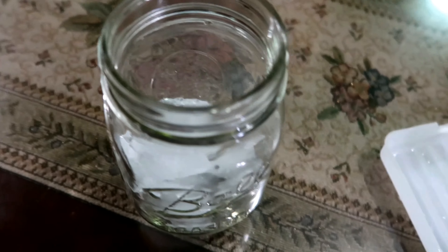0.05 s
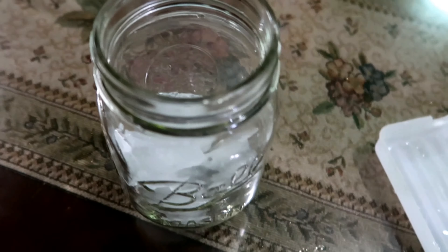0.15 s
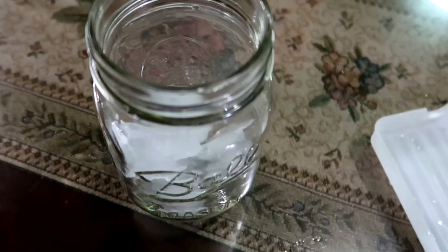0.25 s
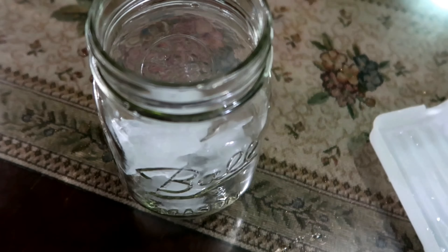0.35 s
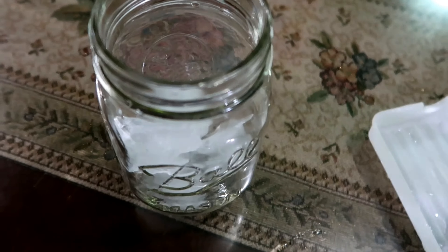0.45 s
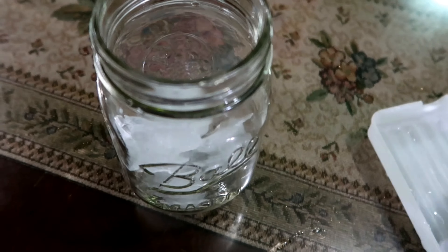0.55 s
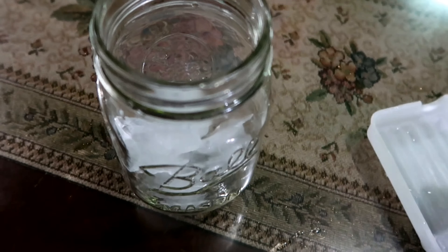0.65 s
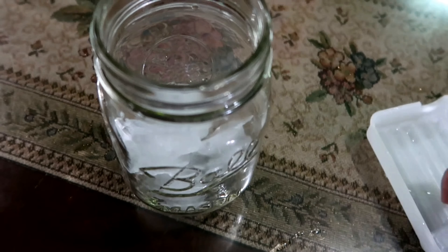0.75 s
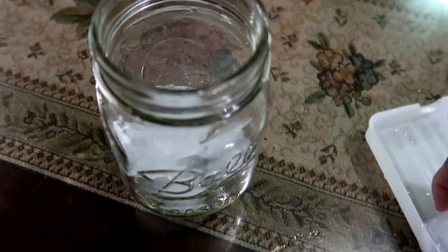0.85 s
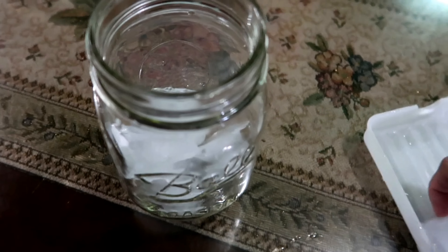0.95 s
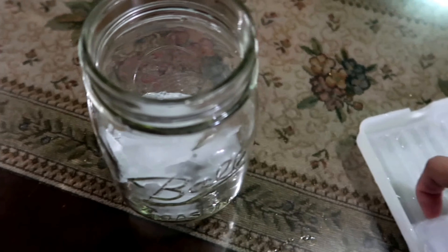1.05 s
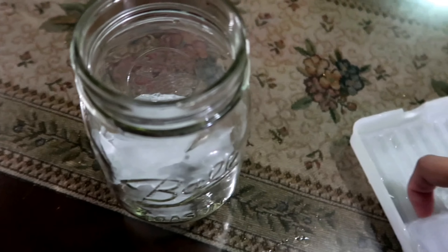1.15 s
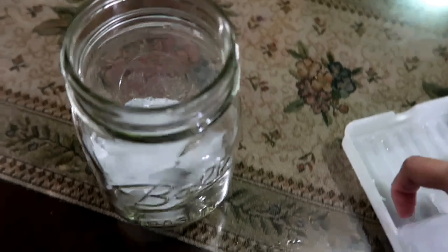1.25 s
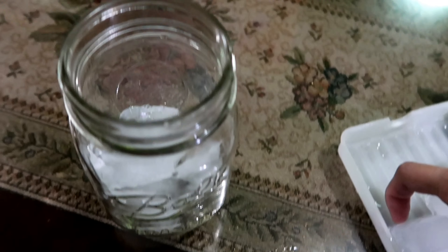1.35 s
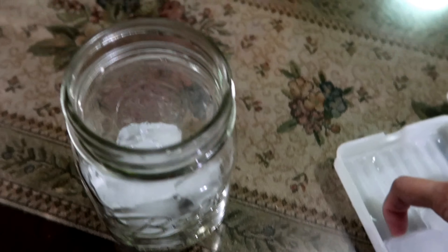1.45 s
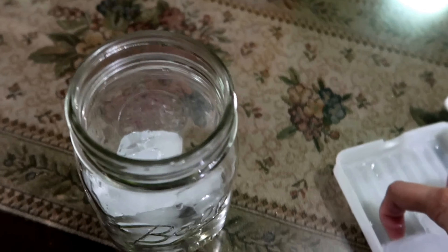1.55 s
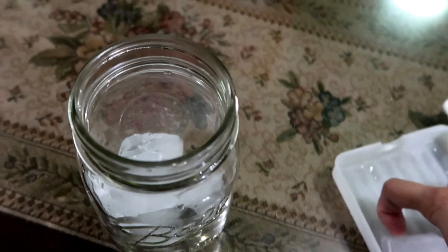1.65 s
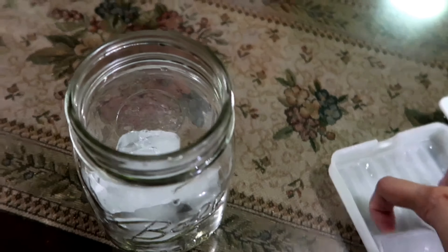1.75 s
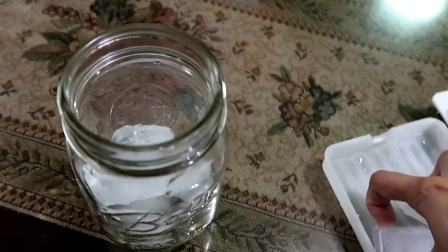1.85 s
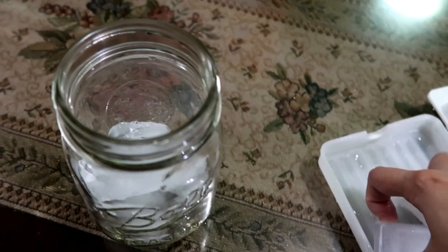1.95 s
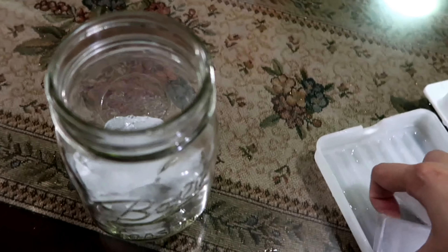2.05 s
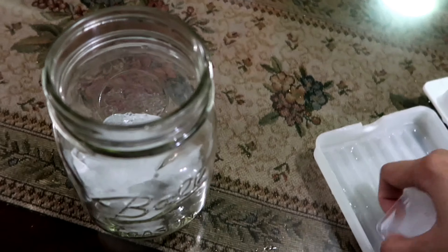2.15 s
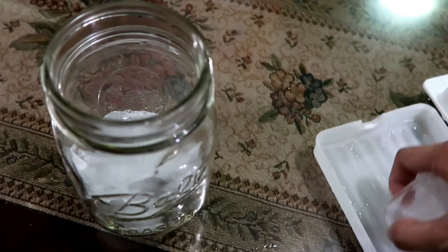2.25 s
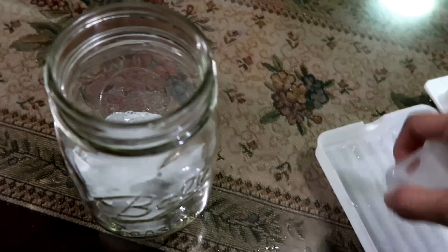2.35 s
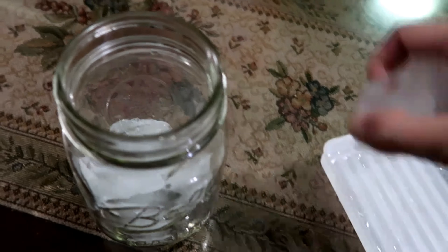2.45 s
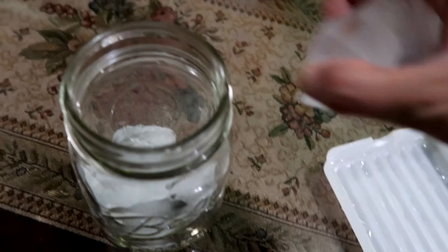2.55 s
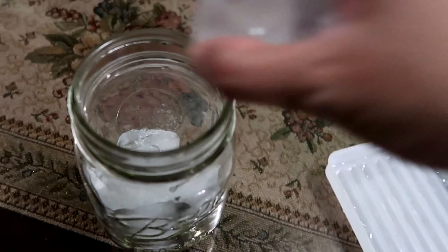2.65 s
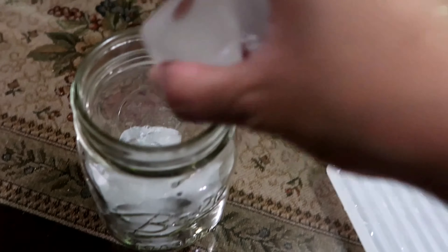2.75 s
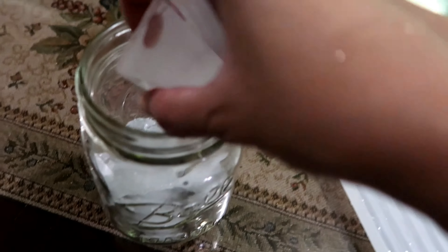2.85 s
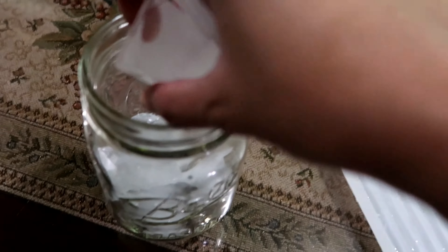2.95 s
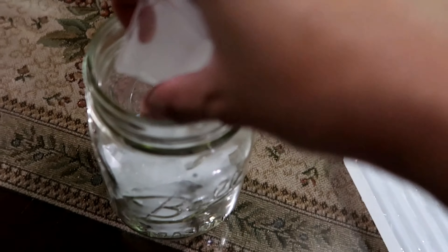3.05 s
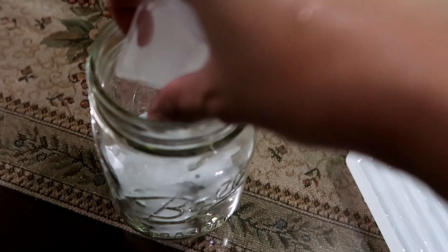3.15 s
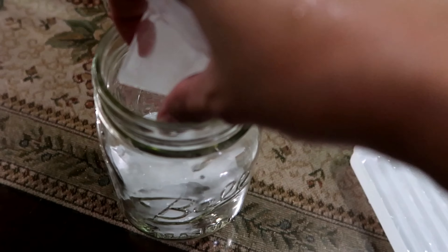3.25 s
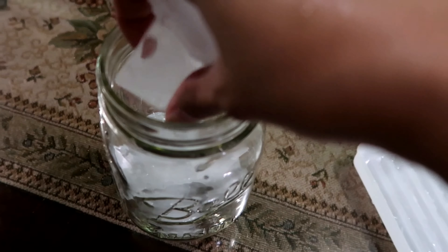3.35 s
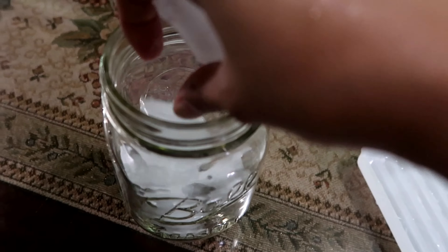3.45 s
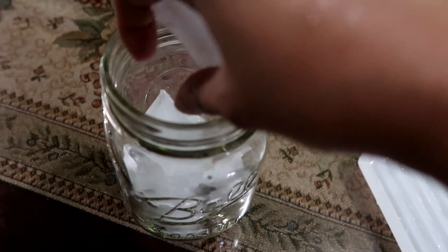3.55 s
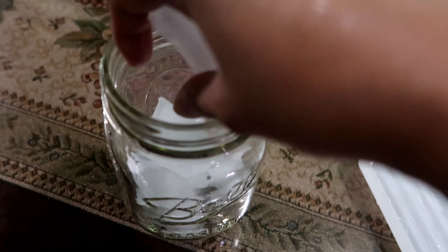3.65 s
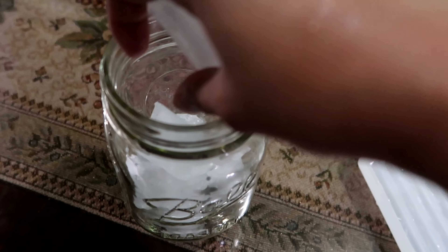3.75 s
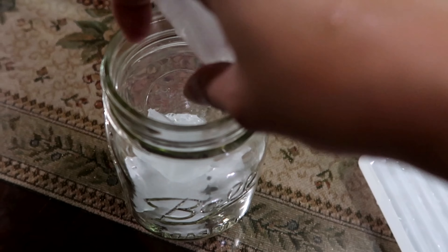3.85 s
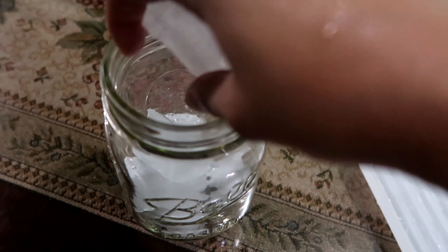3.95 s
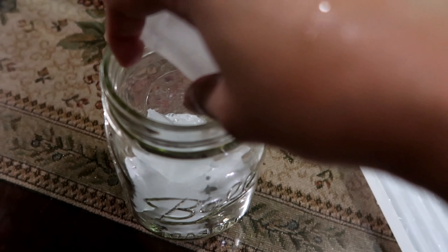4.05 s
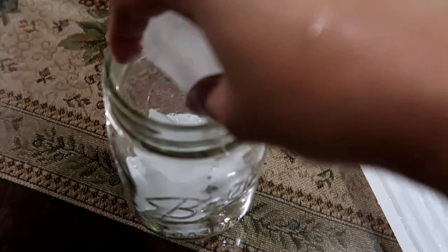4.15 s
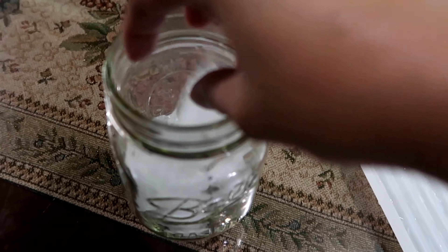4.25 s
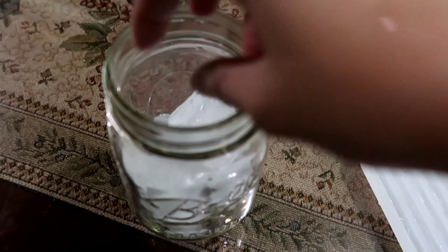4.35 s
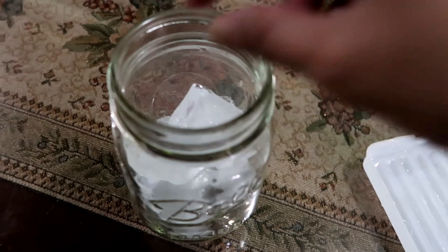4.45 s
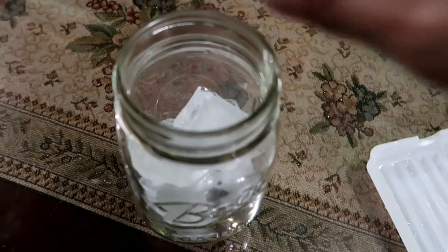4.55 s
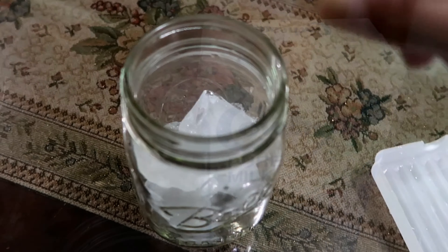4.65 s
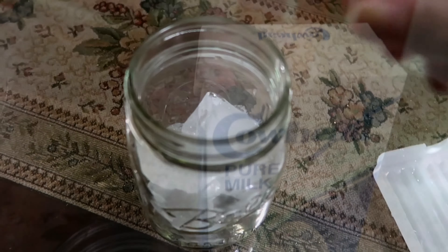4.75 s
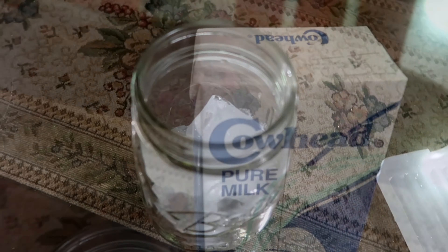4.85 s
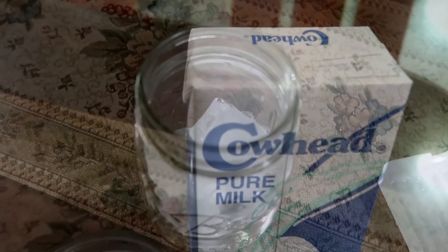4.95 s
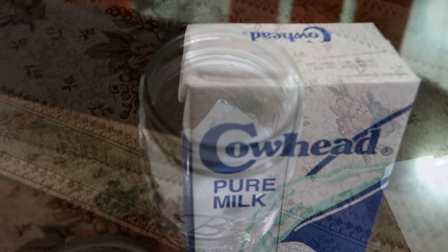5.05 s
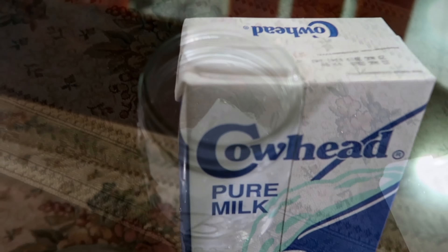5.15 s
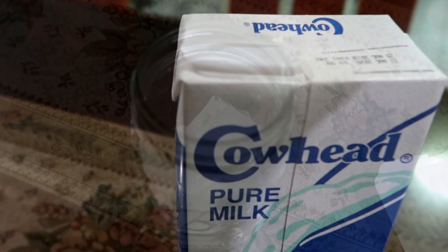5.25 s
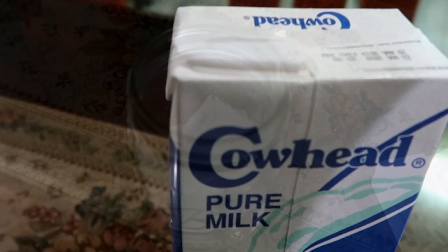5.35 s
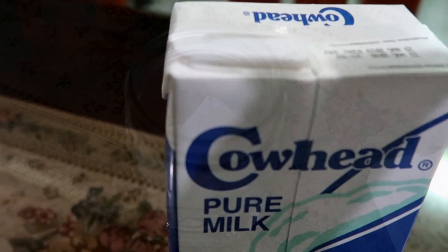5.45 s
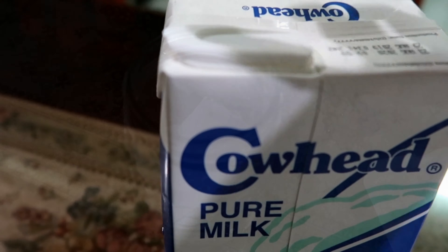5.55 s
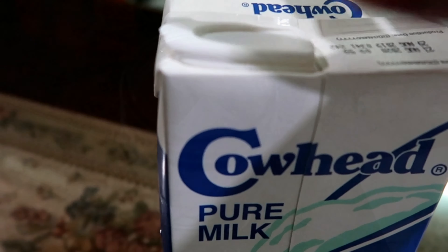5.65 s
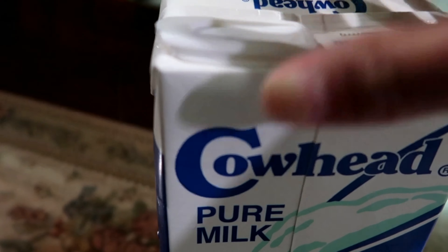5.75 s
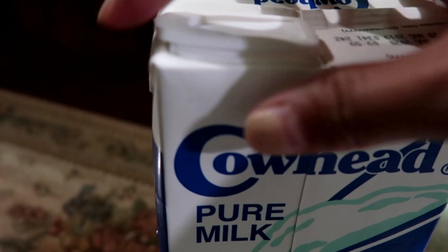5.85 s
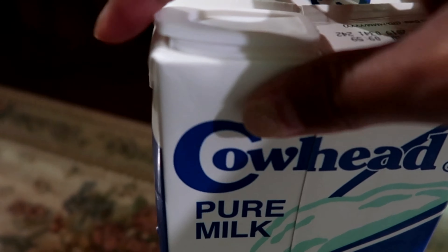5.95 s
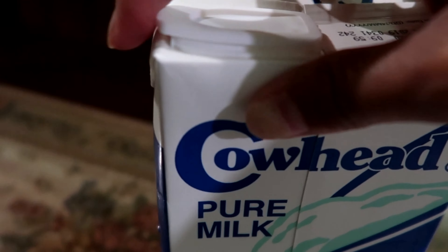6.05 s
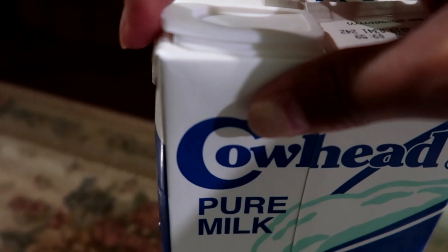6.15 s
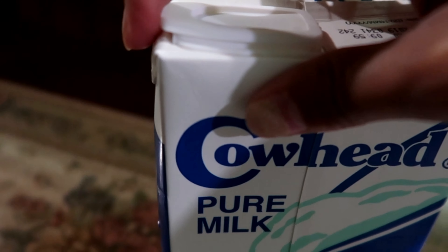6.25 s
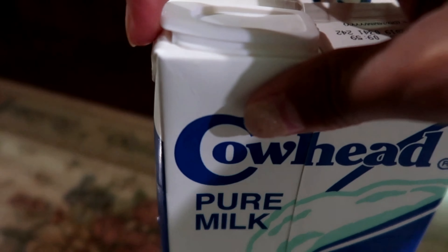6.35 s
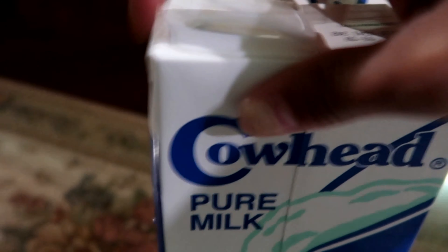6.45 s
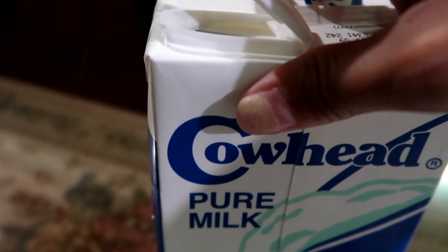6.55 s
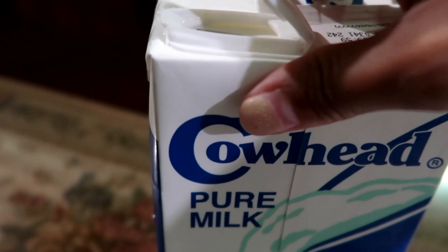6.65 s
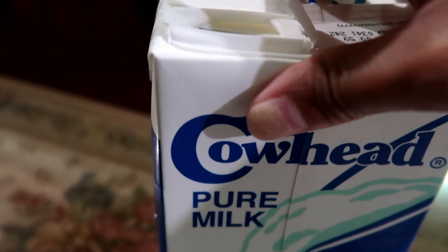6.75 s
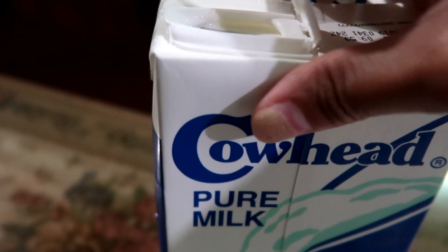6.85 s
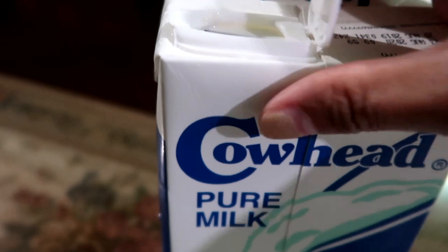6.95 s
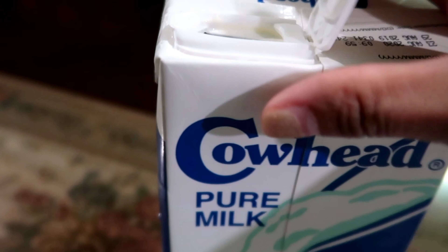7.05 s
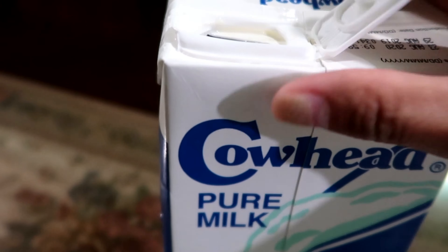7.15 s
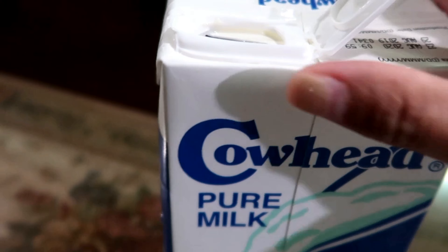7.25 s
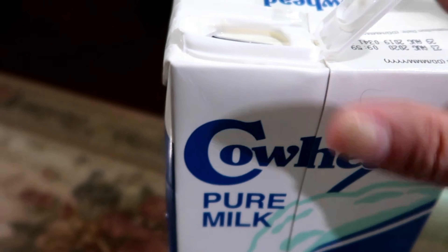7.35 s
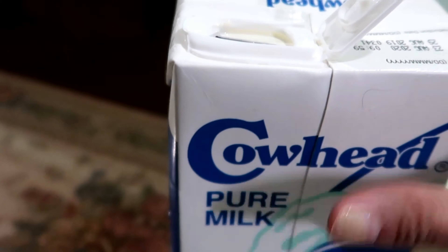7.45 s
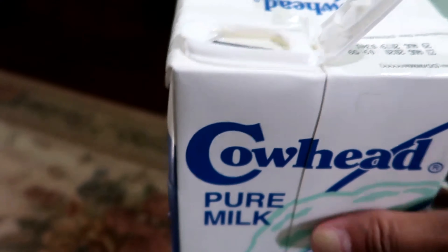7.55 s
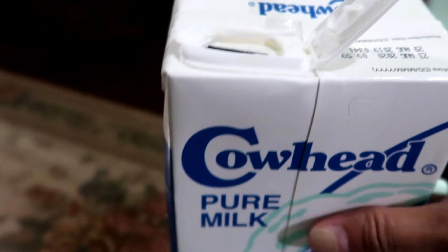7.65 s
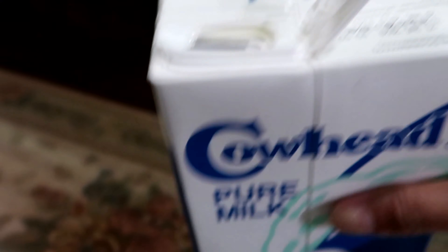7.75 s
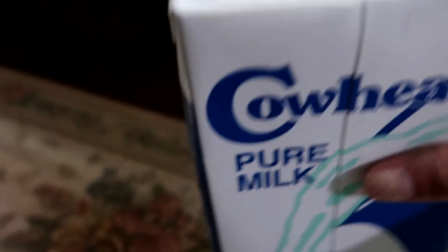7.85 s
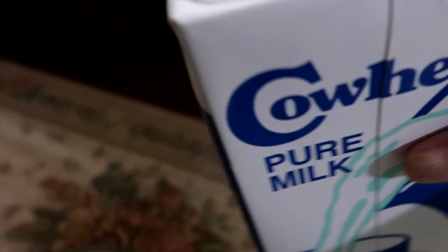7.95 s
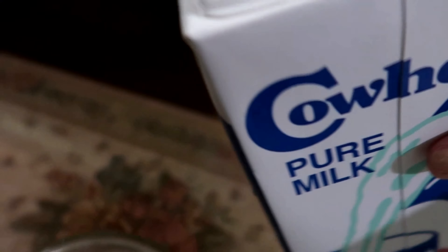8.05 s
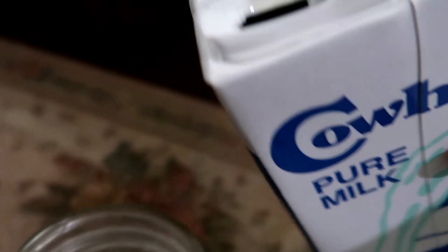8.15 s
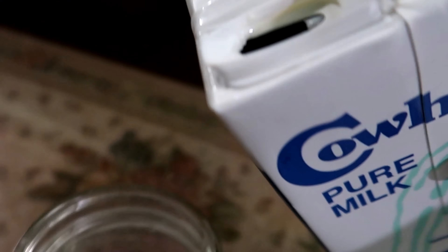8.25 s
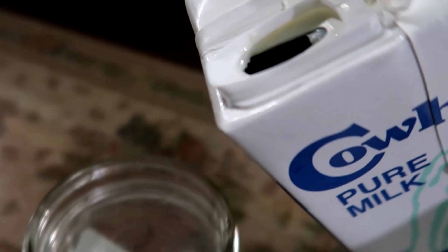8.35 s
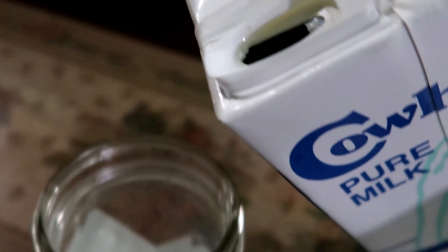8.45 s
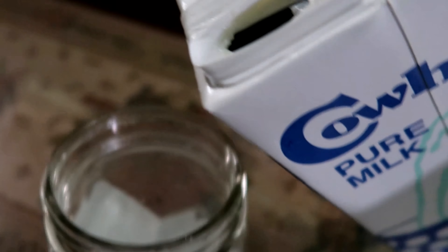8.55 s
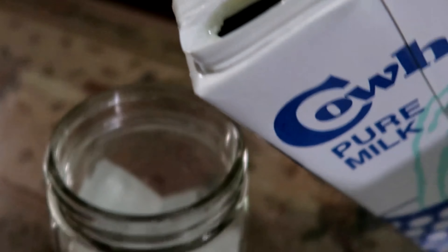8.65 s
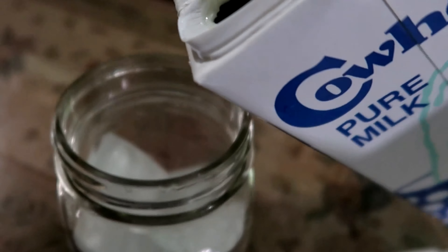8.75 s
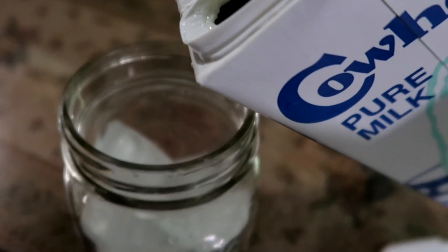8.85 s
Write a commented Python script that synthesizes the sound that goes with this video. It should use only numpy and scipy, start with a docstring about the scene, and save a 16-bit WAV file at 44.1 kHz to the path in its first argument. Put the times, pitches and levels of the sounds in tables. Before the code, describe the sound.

A small kitchen heard close up, with soft low room noise and a fridge hum. From 0.5 to 1.5 s, ice creaks and cracks in a plastic tray slightly right, in short gritty bursts with dry ticks. At about 1.8 s a cube pops loose sharply, with a scrape and rattling chips; faint creaks continue to 2.2 s. Near 3.5 s a cube brushes the jar's rim and lands with a hard knock, bouncing quickly. From 4.3 to 4.7 s another tumbles in: dull thuds, icy clacks and short, grating glass clinks around a high note. The background dips around 5.5 s. Faint carton presses begin at 6 s; a tiny latch tick precedes a loud plastic snap at 6.55 s with a hollow, airy thump. Soft cardboard buckles and finger rubs cluster at 7.0-7.35 s, with two more near 7.7 s, then only room hum to 9 s.

```python
"""Ice creaks and cracks in a plastic tray off to the right, as runs of tiny slips; a cube pops, creaks follow.
A cube brushes the rim of a glass jar; two cubes land, rattle and glance off its wall: thuds and ringing modes.
The background dips, then fingers press a milk carton: buckling card, a hollow body and rubbing noise.
A latch ticks and the plastic flap snaps open with a crack and a puff of air; more handling follows.
Throughout, small dry ticks, soft filtered noise and a humming fridge fill a small kitchen, heard close by."""
import sys
import numpy as np
from scipy import signal
from scipy.fft import rfft, irfft
from scipy.io import wavfile
from scipy.ndimage import uniform_filter1d, minimum_filter1d

SR = 44100
rng = np.random.default_rng(int(sys.argv[2]) if len(sys.argv) > 2 else 0)


def bounce(signal):
    """Save signal as a 16-bit WAV file at the path given by the first command-line argument."""
    frames = np.transpose(np.atleast_2d(signal))
    limited = np.clip(frames, -1, 1)
    pcm = np.round(limited * 32767).astype(np.int16)
    wavfile.write(sys.argv[1], SR, pcm)


N = 392490

# Blow levels are energies spread over 10 ms, before the room is added.
# A cube landing or bouncing in the jar:
# t/s, thud level/dB, thud f/Hz, bottom knock level/dB, ice clack level/dB, brightness/(dB/octave), skid/s
LANDINGS = [(3.55, -22.5, 413, -22.5, -27.5, -1, 0.0023), (3.5688, -32, 437, -31, -43.5, -1.5, 0.005),
            (3.5987, -41, 333, -29.5, -34, -2.5, .003), (3.6155, -44, 333, -33.5, -37, -4, .005),
            (3.652, -50, 400, -39, -64, -4, 0.0043), (3.913, -51.5, 431, -56, -69, -3.5, .003),
            (4.3249, -23.5, 373, -34, -46.5, -5, 0.0037), (4.337, -33.5, 334, -38, -57.5, -5, 0.0045),
            (4.368, -39, 302, -39, -58, -4.5, 0.0053), (4.3785, -22.5, 416, -34, -42, -1.5, 0.0042),
            (4.393, -30.5, 461, -32, -48.5, -4, 0.0068), (4.4238, -27, 503, -24.5, -31.5, -5.5, 0.0035),
            (4.4277, -30.5, 504, -27, -41, -6.5, .003), (4.452, -31.5, 333, -39, -56, -3.5, 0.008),
            (4.4718, -39.5, 332, -30.5, -34.5, -4.5, 0.0045), (4.4883, -37.5, 400, -34, -40.5, -5, .004),
            (4.5016, -39, 396, -36.5, -45, -5.5, .004), (4.545, -39, 398, -38, -50, -4.5, .006)]
# A cube glancing off the glass wall: t/s, ring level/dB, lowest note level/dB, brightness/(dB/octave)
CLINKS = [(4.385, -31, -36, -1.5), (4.4085, -33.5, -29.5, 3.5), (4.4495, -34, -36, 2),
          (4.503, -46.5, -35, -2), (4.555, -50.5, -42.5, 1), (4.617, -57.5, -60, -7), (4.68, -65, -55.5, 0)]
# Modes of the ice cube: f/Hz, energy level/dB, t60/s
ICE_MODES = [(2442, -8, 0.0097), (2805, -0.5, .01), (3480, -7, 0.0089), (4120, -3, 0.0096),
             (5390, -7.5, .014), (7060, -17.5, .01), (8700, -16.5, .03)]
# Modes of the jar's bottom: f/Hz, energy level/dB, t60/s
BOTTOM_MODES = [(544, -3.5, 0.027), (830, -1.5, .016), (1040, -2.5, .018), (1220, -4, .03),
                (1425, 2.5, 0.013), (1685, -1, 0.024), (2060, 3, .022)]
# Modes of the table: f/Hz, energy level/dB, t60/s
TABLE_MODES = [(82, -14, .12), (112, -8, .2), (154, -2, .2), (176, -6, .18), (287, -1, .16), (330, -2, .12),
               (402, -1, .14), (492, 0, .14), (532, -6, .12), (755, -8, .1), (898, -9, .12),
               (1238, -12, .16)]
# Modes of the jar's wall before touch and damping: f/Hz, level struck on wall/dB, level struck on rim/dB, t60/s
GLASS_MODES = [(2080, -16, -12, .06), (3500, -10, -32, .025), (3720, -10, -32, .03), (3860, -5, -30, .07),
               (4020, -7, -32, .05), (4100, -8, -32, .05), (4250, -11, -32, .03), (4400, -8, -23, .08),
               (4600, -13, -32, .04), (4940, -7, -32, .09), (5060, -8, -28, .04), (5190, -8, -24, .05),
               (5330, -9, -34, .04), (5600, -18, -34, .03), (6010, -21, -7, .09), (6950, -23, -42, .04),
               (7045, -20, -42, .06), (8050, -28, -45, .04), (8480, -24, -45, .06), (8590, -18, -45, .11),
               (8730, -25, -45, .07), (9400, -27, -50, .04), (9883, -24, -50, .09), (10380, -22, -50, .12)]
# Ice cracking in the tray: t/s, level/dB, brightness/(dB/octave), slip time scale/s
CREAKS = [(.505, -48.5, 1, 0.013), (.612, -37.5, -.5, 0.015), (.689, -36.5, 4, 0.014),
          (.735, -45, -5, 0.013), (.81, -36, -0.5, 0.009), (.648, -47.5, 3, 0.019), (.865, -47.5, 0, 0.022),
          (1.018, -47, 0.5, 0.0085), (1.040, -31.5, 0, 0.012), (1.281, -39, 1, 0.017),
          (1.3287, -31.5, 1, 0.0039), (1.453, -49, -1, 0.013), (1.738, -33.5, 0, 0.0045),
          (1.773, -29, 3, 0.0091), (2.044, -40.5, 5.5, 0.013), (1.875, -48, 2.5, .02),
          (1.917, -48, 3, .008), (1.401, -48.5, 0.5, .016), (.975, -52, 1, .015), (2.078, -41, -1, 0.013),
          (2.233, -34.5, 1, 0.019), (2.964, -51.5, 0.5, 0.017)]
# Modes of the plastic tray: f/Hz, energy level/dB, t60/s
TRAY_MODES = [(330, -17, .02), (835, -4, 0.016), (965, 5, 0.018), (1250, -4.5, 0.0067), (1460, 7.5, 0.0088),
              (1650, -6, 0.0065), (2160, -6, 0.025), (2520, 0.5, 0.011), (2700, -6, 0.016),
              (4830, -20, .008)]
# Modes of the pocket a cube pops out of: f/Hz, energy level/dB, t60/s
POCKET_MODES = [(311.2, -14, 0.03), (866, -8, 0.027), (1380, -2, 0.009), (1364, -11, 0.056),
                (2107, -3, 0.017), (2450, -3.5, .005), (2700, -5, 0.0046), (3200, -16.5, .01),
                (5100, -17, 0.005), (6360, -17, 0.0069), (7700, -17.5, 0.0039)]
# The pocket's wall buckling around the pop: delay/s, level/dB, f/Hz, cycles to the peak
POCKET_FLICKS = [(0, -18.5, 2396, 1.6), (.001, -19, 1379, 1.4)]
# The flap snapping open and meeting its stop, then a dull second bump of the carton's top:
# t/s, plastic flap level/dB, hollow carton level/dB, carton top level/dB
SNAPS = [(6.5496, -24.5, -22, -19.5), (6.5595, -38, -45, -50), (6.564, -52, -41, -31)]
# Fingers pressing the carton:
# t/s, hollow body level/dB, panel level/dB, panel f/Hz, rub level/dB, slip time scale/s
PRESSES = [(6.033, -71.5, -70, 1150, -67.5, 0.016), (6.092, -57, -58, 790, -58.5, 0.025),
           (6.150, -58, -60, 383, -69, .0055), (6.308, -64.5, -57.5, 850, -67, .014),
           (6.971, -57, -58, 602, -71, 0.0093), (7.025, -67, -70, 850, -59, 0.05),
           (7.107, -46, -45.5, 845, -56.5, 0.0034), (7.143, -43.5, -55.5, 615, -67, 0.035),
           (7.193, -40.5, -42.5, 700, -57, 0.0033), (7.217, -47, -49, 680, -68, .015),
           (7.33, -45.5, -55, 416, -67, 0.0051), (7.3396, -43.5, -45.5, 878, -53.5, 0.0021),
           (7.348, -46, -50, 622, -59, .002), (7.675, -50.5, -56, 647, -55, 0.0027),
           (7.73, -59, -62, 800, -60, 0.047)]
# Modes of the plastic flap: f/Hz, energy level/dB, t60/s
FLAP_MODES = [(1616, 5, 0.019), (2230, 4, 0.012), (2730, -3.5, .01), (3145, 2, .05), (3430, -9, .014),
              (3910, -1, 0.0065), (4700, -15, .005), (5561, -14, .007), (6540, -7.5, 0.0051),
              (7650, -4, 0.0035), (8600, -17, .005), (9900, -20.5, .002)]
# Modes of the flap's latch: f/Hz, energy level/dB, t60/s
LATCH_MODES = [(1170, -3, .03), (1900, -1.5, .035), (3970, -3, .014), (4160, -4, .014)]
# Modes of the hollow carton: f/Hz, energy level/dB, t60/s
CARTON_MODES = [(256, 3, 0.035), (334, 2, 0.04), (402, 3, 0.034), (575, -1, 0.025), (705, -1.5, 0.039),
                (899, -6.5, 0.047)]
# Small dry ticks of ice and plastic: t/s, level/dB, f/Hz, rise/s
TICKS = [(0.664, -36, 1200, 0.0016), (0.7043, -44, 1110, 0.0015), (1.0495, -39, 1290, .0008),
         (1.2921, -55, 5640, .0004), (1.3296, -36.5, 1430, 0.0009), (1.7399, -38, 1190, 0.0019),
         (1.75, -45, 1200, 0.00078), (1.7738, -30.5, 1170, 0.0011), (2.0445, -50, 2900, 0.00059),
         (2.0902, -47.5, 990, 0.002), (2.235, -40.5, 1275, 0.0012), (2.2487, -44, 1000, 0.00097),
         (2.613, -59.5, 4990, .0001), (4.3847, -39, 7000, 0.0022), (4.531, -37.5, 2710, .0012),
         (4.676, -59.5, 5100, 0.0004), (7.339, -63, 5100, .0005)]
# Relative spectrum of a contact's bare crack: f/Hz, density level/dB
CRACK_SPECTRUM = [(40, -26), (150, -6), (500, -0.5), (1500, 1), (3000, -9.5), (5000, -17), (8000, -17.5),
                  (10000, -37.5), (12000, -44.5)]
# Decay of the kitchen: f/Hz, t60/s
ROOM_DECAY = [(150, 0.56), (400, 0.5), (1000, 0.53), (2500, 0.55), (5000, 0.33), (9000, 0.41)]
# Relative spectrum of the room noise: f/Hz, density level/dB
AIR_SPECTRUM = [(15, -29), (26, -5.5), (38, 2), (52, -3), (141, -10), (173, -8), (207, -2.5), (235, -9.5),
                (311, -14), (531, -19), (651, -17), (703, -20.5), (798, -20.5), (954, -23), (8100, -45),
                (11000, -63), (14300, -91), (22000, -120)]
# Stereo width of the room noise: f/Hz, side minus mid level/dB
AIR_SIDE = [(60, -21), (170, -9.5), (490, -4.5), (1400, 0), (3990, 0.5), (11400, 5.5)]
# Reference level shared by room noise and hum: t/s, level/dB
BACKGROUND_LEVEL = [(0, -55), (0.8, -51), (3.4, -53), (4.05, -55.5), (4.8, -51), (5.45, -62), (5.85, -64),
                    (6.25, -56.5), (6.9, -56.5), (7.4, -52), (8.9, -51.5)]
# Noise bands of the fridge: f/Hz, level against the reference/dB, half width at half amplitude/Hz
FRIDGE_HUM = [(204.6, -11.5, 3), (810, -21.5, 36)]

# The first cube brushes the rim
RIM_S, RIM_THUD_DB, RIM_RING_DB, RIM_NOTE_DB = 3.492, -46, -51, -41
# The glass on a landing: ring against the clack, its brightness in dB per octave, lowest note against the clack
LANDING_RING_DB, LANDING_RING_BRIGHT, LANDING_NOTE_DB = -18, -2, -8
CHATTER_DB, CHATTER_S = -13, 0.028  # the cube's chatter: level against the blow, time scale
PUSH_CYCLES, TABLE_RING_DB = 0.54, -5.5  # cycles until a thud peaks; the table's ring against the thud
# The jar's lowest note: pitch, t60 ringing free, t60 with loose ice against it
NOTE_HZ, NOTE_FREE_T60_S, NOTE_T60_S = 2005, .28, .19
FLUTTER_PER_S, FLUTTER_DB = 55, 2.5  # random level changes of the lowest note: rate, depth
TOUCH_DB = 3.5  # largest change of a wall mode's level from touch to touch
# Ice grating along the wall: level against the ring, time scale, divisor of the glass's t60
GRATING_DB, GRATING_S, GRATING_DAMPING = -7.5, 0.022, 4.4
WALL_THUD_HZ, CLINK_SKID_S = 420, 0.0019
WALL_THUD_DB, WALL_KNOCK_DB, WALL_CLACK_DB = -4.5, -7.5, -13.5  # against the ring

# The plastic strains before each slip: lead, level against the creak, time scale
STRAIN_LEAD_S, STRAIN_DB, STRAIN_S = 0.019, -18, 0.015
SPLINTER_DB = -4.5  # separate cracks within a slip, against the slip
CRUMBS_DB, CRUMBS_S = -15, 0.055  # crumbs settling: level against the slip, fade time scale
POP_S, POP_DB = 1.7843, -21
# The popped cube scrapes free; brightness in dB per octave
SCRAPE_AFTER_S, SCRAPE_DB, SCRAPE_BRIGHT, SCRAPE_S = 0.0039, -30.5, 4.9, 0.0061
RATTLE_AFTER_S, RATTLE_DB, RATTLE_S = 0.048, -39, .055  # loosened chips: delay, level, fade time scale

LATCH_S, LATCH_DB = 6.483, -53.5
PUFF_DB, PUFF_HZ = -3, 265  # thump of air in the carton: level against the hollow sound, pitch
LID_AFTER_S, LID_HZ, LID_CYCLES = 0.00054, 884, 1.87  # jump of the carton's top: delay, pitch, cycles to peak
PANEL_T60_S, RUB_S = 0.042, 0.0046  # ring of a buckled panel; how much longer the rub's time scale is
# The card springs back: delay, level against the press, slip time scale, extra level of the panel
SPRING_AFTER_S, SPRING_DB, SPRING_SLIP_S, SPRING_PANEL_DB = .017, -8.5, 0.0089, -4.5
EDGE_HZ = 11800  # final low-pass


def jar():
    """Cubes brush the rim, land and bounce on the jar's bottom, and glance off its ringing wall."""
    out = np.zeros(N)
    rim_thud = amp(RIM_THUD_DB) * push(WALL_THUD_HZ, cycles=1.5)
    rim_ring = amp(RIM_RING_DB) * glass(bright=-1, skid_s=.0005, rim=True)
    add(out, RIM_S, together(rim_thud, rim_ring, amp(RIM_NOTE_DB) * note(NOTE_FREE_T60_S)))
    for s, thud_db, thud_hz, knock_db, clack_db, bright, skid_s in LANDINGS:
        add(out, s, contact(thud_db, thud_hz, knock_db, clack_db, bright, skid_s))
        wall = amp(LANDING_RING_DB) * glass(LANDING_RING_BRIGHT, skid_s=0.0023)
        add(out, s, amp(clack_db) * together(wall, amp(LANDING_NOTE_DB) * note(NOTE_T60_S)))
    for s, db, note_db, bright in CLINKS:
        grating = amp(GRATING_DB) * glass(bright, GRATING_S, damping=GRATING_DAMPING)
        knock = contact(db + WALL_THUD_DB, WALL_THUD_HZ, db + WALL_KNOCK_DB, db + WALL_CLACK_DB,
                        bright=-1, skid_s=.007)
        wall = amp(db) * together(glass(bright, CLINK_SKID_S), grating)
        add(out, s, together(wall, knock, amp(note_db) * note(NOTE_T60_S)))
    return kitchen(out, wet_db=-10.0, early_db=-12.5)


def contact(thud_db, thud_hz, knock_db, clack_db, bright, skid_s):
    """A cube thumps the table through the jar and knocks on its bottom; the ice itself clacks and chatters."""
    thud = together(push(thud_hz, PUSH_CYCLES), amp(TABLE_RING_DB) * ring(TABLE_MODES, scatter=0.0025))

    def bottom_and_ice(scatter):
        """The two struck bodies at their own levels, their pitches scattered anew."""
        bottom = amp(knock_db) * body(BOTTOM_MODES, crack_db=-2, scatter=scatter)
        ice = amp(clack_db) * body(ICE_MODES, crack_db=-3.5, scatter=scatter)
        return bottom, ice

    # strike() returns energy 1, so each part gets its level back
    blow = [np.linalg.norm(part) * strike(part, bright, skid_s, clean_s=.0015)
            for part in bottom_and_ice(scatter=0.034)]
    chatter = [np.linalg.norm(part) * strike(part, bright, CHATTER_S, grain_db=6.5)
               for part in bottom_and_ice(scatter=.09)]
    return together(amp(thud_db) * thud, sum(blow), amp(CHATTER_DB) * sum(chatter))


def glass(bright, skid_s, rim=False, damping=0.98):
    """The jar's wall rings, each touch favouring other modes; ice resting against it shortens the ring."""
    modes = []
    for hz, on_wall, on_rim, t60 in GLASS_MODES:
        level_db = (on_rim if rim else on_wall) + TOUCH_DB * rng.uniform(-1, 1)
        modes.append((hz, level_db, t60 / damping))
    response = ring(modes, scatter=.004 * damping)
    return strike(response, bright, skid_s, grain_db=6, high_hz=10000, clean_s=.0015)


def note(t60):
    """The jar's lowest note, the mouth flexing into an oval; it flutters as ice brushes the wall."""
    tone = ring([(NOTE_HZ, 0, t60)], scatter=.001)
    steps = np.arange(len(tone)) / SR * FLUTTER_PER_S
    flutter = np.interp(steps, np.arange(64), rng.standard_normal(64))
    return unit(tone * amp(FLUTTER_DB * flutter))


def tray():
    """Ice sticks, slips and cracks in the plastic, off to the right; a cube pops free, fainter creaks follow."""
    out, pops = np.zeros((2, N))
    for s, db, bright, slip_s in CREAKS:
        add(out, s - STRAIN_LEAD_S, creak(db, bright, slip_s))
    pocket = body(POCKET_MODES, crack_db=-11.5, scatter=0.0054)
    add(pops, POP_S, amp(POP_DB) * strike(pocket, 0, slip_s=0.0013, clean_s=.001))
    for after_s, db, hz, cycles in POCKET_FLICKS:
        add(pops, POP_S + after_s, amp(db) * push(hz, cycles))
    add(out, POP_S + SCRAPE_AFTER_S - STRAIN_LEAD_S, creak(SCRAPE_DB, SCRAPE_BRIGHT, SCRAPE_S))
    rattle = crumbs(RATTLE_S, low_hz=965, high_hz=3198, count=24)
    add(out, POP_S + RATTLE_AFTER_S, amp(RATTLE_DB) * rattle)
    # the open pocket faces the microphone, so the pop arrives drier than the creaks
    creaks_heard = kitchen(out, wet_db=-10.5, early_db=-12.5, lag_size=3)
    pops_heard = kitchen(pops, wet_db=-23, early_db=-21.5, lag_size=2)
    return (creaks_heard + pops_heard) * amp([[-1.1], [1.1]])


def creak(db, bright, slip_s):
    """The plastic strains, the ice slips and splinters, and crumbs settle; the slip comes STRAIN_LEAD_S in."""
    plastic = body(TRAY_MODES, crack_db=2, scatter=0.058)
    splinters = amp(SPLINTER_DB) * crumbs(.5 * slip_s, low_hz=900, high_hz=4020, t60=0.0043, count=6)
    crack = strike(plastic, bright, slip_s, grain_db=6, clean_s=0.0012)
    slip = together(crack, splinters, amp(CRUMBS_DB) * crumbs(CRUMBS_S, count=14))
    strain = amp(STRAIN_DB) * strike(plastic, bright, STRAIN_S, grain_db=4.0)
    lead = round(STRAIN_LEAD_S * SR)
    return amp(db) * unit(together(strain, np.pad(slip, (lead, 0))))


def crumbs(die_s, low_hz=850, high_hz=3400, t60=0.013, spread_db=4, count=22):
    """Chips tap at random over three fade time scales, each at its own pitch and size, fading on average."""
    out, t = np.zeros(SR // 2), np.arange(1024) / SR
    for when, pitch, size in rng.random((count, 3)):
        hz = low_hz * (high_hz / low_hz) ** pitch
        tap = unit(np.sin(2 * np.pi * hz * t) * np.exp(-np.log(1000) * t / t60))
        level = amp(spread_db * 2 * size) * np.exp(-2 * when) * np.sqrt(low_hz / hz)  # high taps are softer
        add(out, 3 * when * die_s, level * tap)
    return unit(out)


def carton():
    """A latch ticks, the flap cracks open and its stop answers; pressed card gives and springs back."""
    out, plastic = np.zeros((2, N))
    latch = body(LATCH_MODES, crack_db=-9, scatter=.005)
    add(out, LATCH_S, amp(LATCH_DB) * strike(latch, 0, slip_s=0.0018))
    for s, flap_db, body_db, lid_db in SNAPS:
        flap = strike(body(FLAP_MODES, crack_db=-5, scatter=.002), 0, slip_s=.0004,
                      grain_db=0, high_hz=9960, clean_s=0.00051)
        add(plastic, s, amp(flap_db) * flap)
        box = amp(-3) * strike(ring(CARTON_MODES, scatter=0.03), 0, slip_s=.002)
        hollow = amp(body_db) * together(box, amp(PUFF_DB) * push(PUFF_HZ, cycles=.9))
        add(out, s + LID_AFTER_S, together(hollow, amp(lid_db) * push(LID_HZ, LID_CYCLES)))
    for s, body_db, panel_db, panel_hz, rub_db, slip_s in PRESSES:
        add(out, s, press(body_db, panel_db, panel_hz, rub_db, slip_s))
        spring = press(body_db, panel_db + SPRING_PANEL_DB, panel_hz, rub_db, SPRING_SLIP_S)
        add(out, s + SPRING_AFTER_S, amp(SPRING_DB) * spring)
    # the flap has a slightly louder room tail and weaker near reflections than the carton
    return kitchen(out, wet_db=-17.5, early_db=-12) + kitchen(plastic, wet_db=-16, early_db=-15.5)


def press(body_db, panel_db, panel_hz, rub_db, slip_s):
    """A panel of card buckles with a dull pitched bump; the hollow carton answers and the finger rubs."""
    hollow = strike(ring(CARTON_MODES, scatter=0.022), -1, slip_s, high_hz=980, clean_s=0.0023)
    panel = strike(ring([(panel_hz, 0, PANEL_T60_S)]), 0, slip_s, high_hz=950, clean_s=0.0021)
    rub = strike(bare_crack(), 0.4, slip_s + RUB_S, high_hz=5460, clean_s=.0005)
    return together(amp(body_db) * hollow, amp(panel_db) * panel, amp(rub_db) * rub)


def ticks():
    """Tiny contacts of ice and plastic that swell and ring for a few cycles."""
    out = np.zeros(N)
    for s, db, hz, rise_s in TICKS:
        add(out, s, amp(db) * push(hz, hz * rise_s))
    return kitchen(out, wet_db=-15.0, early_db=-12.5, lag_size=1)


def background():
    """Filtered stereo noise for the room, narrow noise and a steady tone for the fridge; both dip midway."""
    hz, t = np.fft.rfftfreq(N, 1 / SR), np.arange(N) / SR
    mid, side, motor = rfft(rng.standard_normal((3, N)))
    side = side * amp(read(AIR_SIDE, hz))
    left_right = np.array([mid + side, mid - side])
    air = np.sqrt(2 * N) * unit(irfft(left_right * amp(read(AIR_SPECTRUM, hz)), N))
    hum = np.zeros(N)
    for f, db, width in FRIDGE_HUM:
        band = irfft(motor / (1 + ((hz - f) / width) ** 2), N)
        hum += amp(db) * np.sqrt(N) * unit(band)
    hum += amp(-5.5) * np.sin(2 * np.pi * FRIDGE_HUM[0][0] * t)  # the motor's steady core
    level_db = np.interp(t, *np.transpose(BACKGROUND_LEVEL))
    return amp(level_db) * (amp(-1.5) * air + hum)


def kitchen(x, wet_db, early_db, lag_size=0):
    """Direct sound, near surfaces and a diffuse tail reach two closely spaced microphone ports."""
    slots = np.arange(160, SR - 40, 12)
    at = slots + rng.integers(0, 12, len(slots))
    sign, taps = rng.choice([-1., 1.], len(at)), np.zeros((2, SR))
    taps[0, at] = sign
    taps[1, at + rng.integers(-3, 4, len(at))] = sign
    hz, t, z = signal.stft(taps, SR, nperseg=256)
    decay = np.exp(-np.log(1000) * t / read(ROOM_DECAY, hz)[:, None])
    tail = signal.istft(z * decay, SR, nperseg=256)[1][:, :SR]
    t = np.arange(SR) / SR
    tail *= 1 - np.exp(-t / 0.0098)
    early = taps * np.exp(-t / 0.0081)
    paths = np.sqrt(2) * (amp(wet_db) * unit(tail) + amp(early_db) * unit(early))
    paths[0, lag_size] += 1  # sound from the right reaches the left port later
    paths[1, 0] += 1
    return signal.fftconvolve(x[None], paths, axes=1)[:, :N]


def strike(response, bright, slip_s, grain_db=4, low_hz=150, high_hz=9500, clean_s=0.002, size=8192):
    """A contact and a swelling, dying run of tiny slips excite an object, tilted by its brightness."""
    t = np.arange(size) / SR
    slips = rng.standard_normal(size) * amp(grain_db * np.minimum(rng.exponential(1, size), 5))
    share = slip_s ** 2 / (slip_s ** 2 + clean_s ** 2)  # contacts well below clean_s are nearly one clean blow
    force = np.sqrt(share) * unit(slips * np.sqrt(t) * np.exp(-1.5 * t / slip_s))
    force[0] += np.sqrt(1 - share)

    def colour_db(hz):
        """Small objects radiate little bass, and the contact time limits the treble."""
        tilt = bright * np.log2(np.clip(hz, 120, 9000) / 1000)
        return tilt - 10 * np.log10(1 + (low_hz / (hz + 10)) ** 4 + (hz / high_hz) ** 12)

    coloured = signal.fftconvolve(force, causal(colour_db))
    return unit(signal.fftconvolve(coloured, response))


def push(hz, cycles):
    """A blunt blow: a surface swells to its widest swing in so many cycles and falls still."""
    turns = hz * np.arange(2048) / SR
    u = turns / cycles
    return unit(np.sin(2 * np.pi * turns) * u ** 2 * np.exp(-2 * u))


def body(modes, crack_db, scatter):
    """A damped object: its modes and the crack of the contact."""
    sound, crack = ring(modes, scatter), bare_crack()
    return unit(together(sound, amp(crack_db) * crack))


def bare_crack():
    """The broadband click of a contact."""
    return causal(lambda hz: read(CRACK_SPECTRUM, hz))


def ring(modes, scatter=0.):
    """Dying modes, neighbours in opposite phase; pitches shift a little with the point of contact."""
    t = np.arange(SR // 2) / SR
    total = np.zeros(len(t))
    for k, (hz, db, t60) in enumerate(modes):
        shifted_hz = hz * (1 + scatter * rng.uniform(-1.2, 1))
        tone = np.sin(2 * np.pi * shifted_hz * t) * np.exp(-np.log(1000) * t / t60)
        total += (-1) ** k * amp(db) * unit(tone)
    return unit(total)


def causal(db_at, size=4096):
    """The sharpest click that has a given spectrum (minimum phase)."""
    log_gain = np.log(amp(db_at(abs(np.fft.fftfreq(size, 1 / SR)))))
    spectrum = np.exp(np.conj(signal.hilbert(log_gain)))
    return unit(np.fft.ifft(spectrum).real[:size // 2])


def together(*sounds):
    """Sums sounds that start at the same moment."""
    size = max(map(len, sounds))
    return sum(np.pad(sound, (0, size - len(sound))) for sound in sounds)


def add(mix, s, sound):
    """Mixes in a blow whose level is its energy spread over 10 ms."""
    part = mix[round(s * SR):][:len(sound)]
    part += sound[:len(part)] * np.sqrt(SR / 100)


def read(points, hz):
    """Reads a table on a log-frequency axis."""
    f, value = np.transpose(points)
    return np.interp(np.log(hz + 1), np.log(f + 1), value)


def unit(x):
    """Scales to energy 1."""
    return x / np.sqrt(np.sum(x ** 2) + 1e-20)


def amp(db):
    """Decibels to gain."""
    return 10 ** (np.asarray(db) / 20)


def limit(x, ceiling_db=-6):
    """A fast limiter turns down the few cycles that pass its ceiling, both channels alike."""
    gain = np.minimum(1, amp(ceiling_db) / (abs(x).max(axis=0) + 1e-9))
    return x * uniform_filter1d(minimum_filter1d(gain, size=65), size=65)


def scene():
    """Everything on the table, in the kitchen."""
    return tray() + jar() + ticks() + carton() + background()


def record(dry):
    """A peak limiter, then a steep low-pass that closes off the top treble."""
    low_pass = signal.firwin(255, EDGE_HZ, window=("kaiser", 8), fs=SR)
    return signal.oaconvolve(limit(dry), low_pass[None], "same")


dry = scene()
out = record(dry)
bounce(out)
```